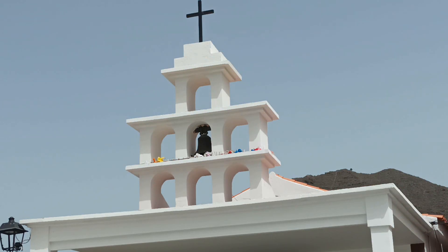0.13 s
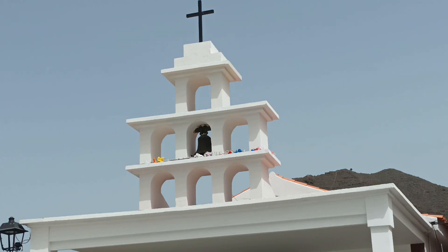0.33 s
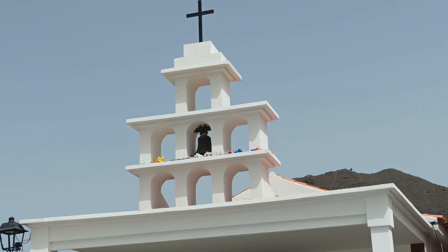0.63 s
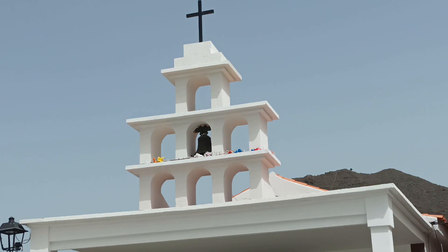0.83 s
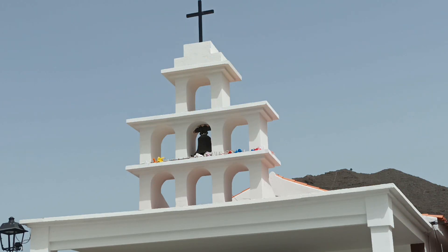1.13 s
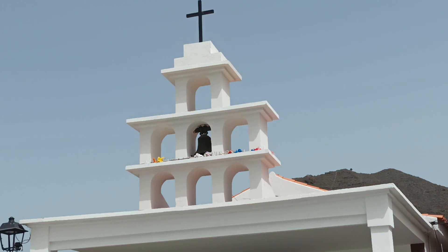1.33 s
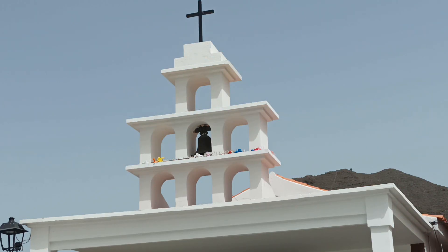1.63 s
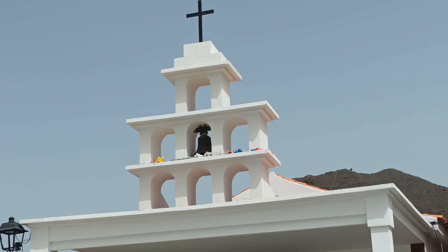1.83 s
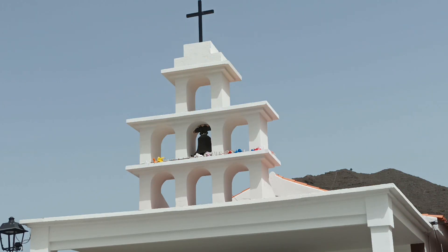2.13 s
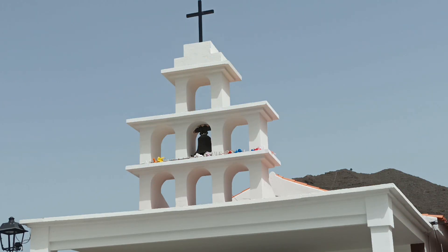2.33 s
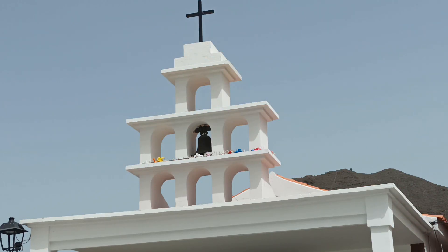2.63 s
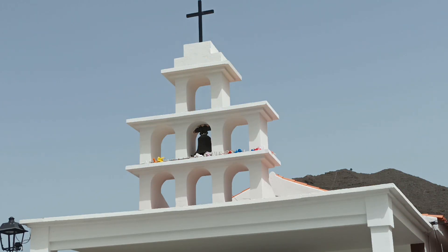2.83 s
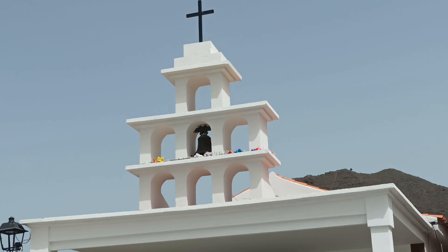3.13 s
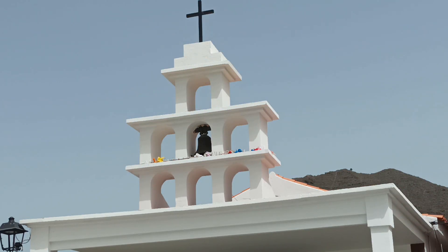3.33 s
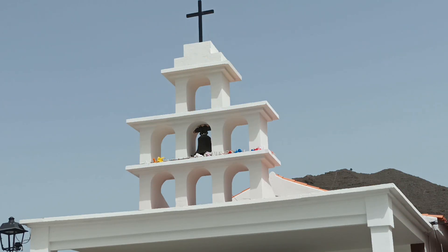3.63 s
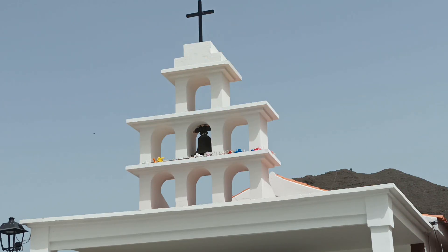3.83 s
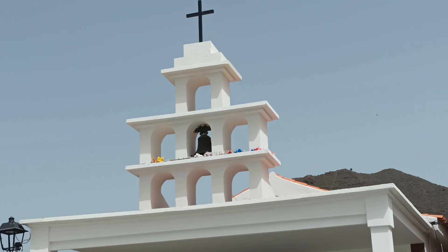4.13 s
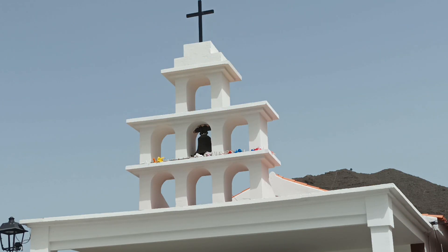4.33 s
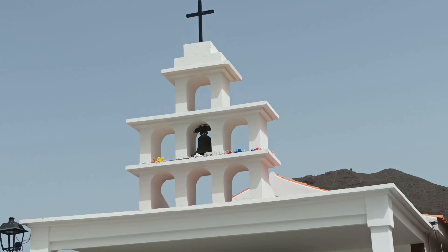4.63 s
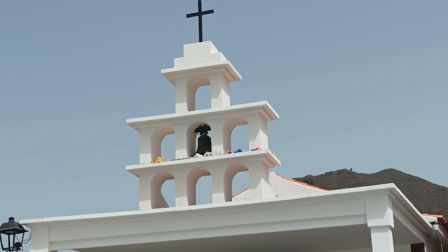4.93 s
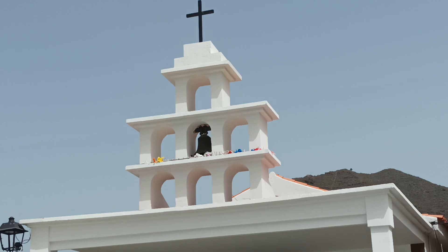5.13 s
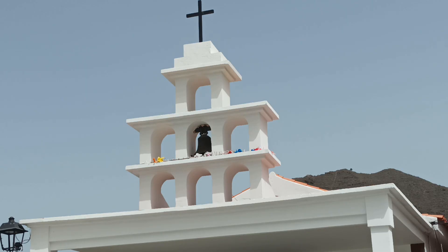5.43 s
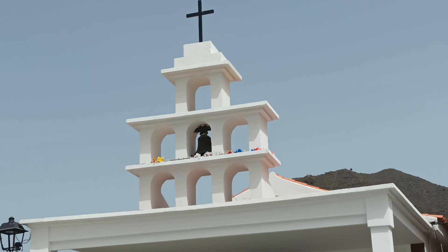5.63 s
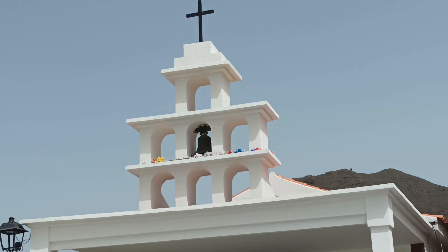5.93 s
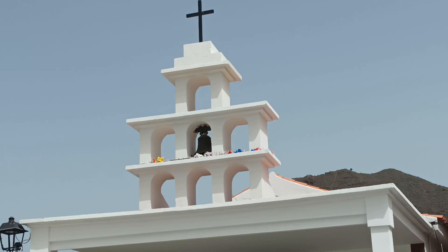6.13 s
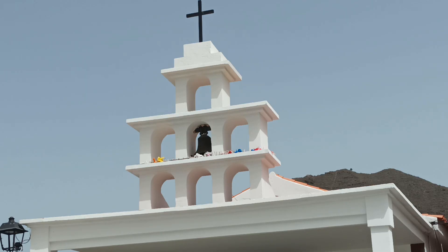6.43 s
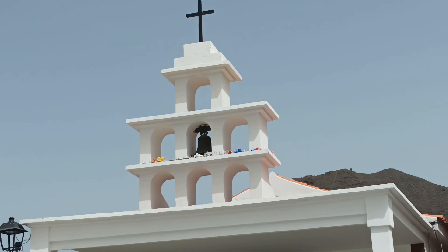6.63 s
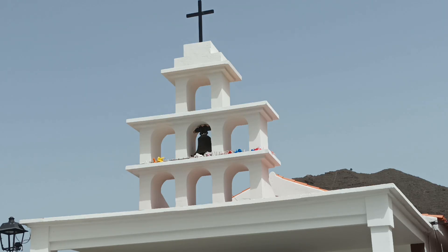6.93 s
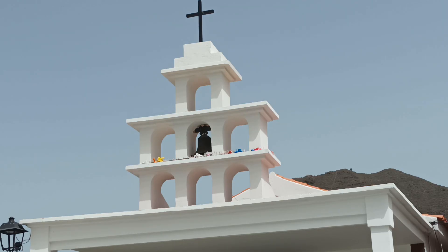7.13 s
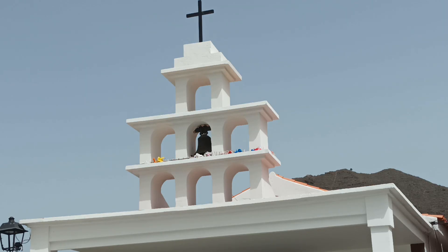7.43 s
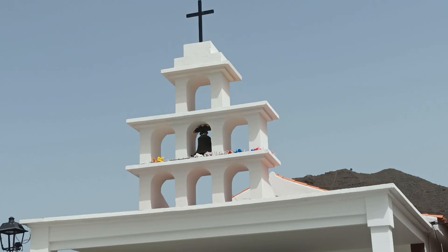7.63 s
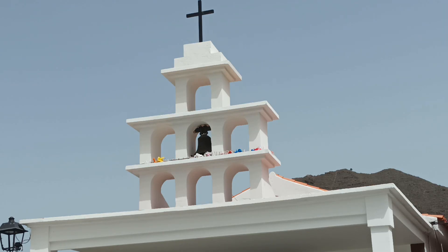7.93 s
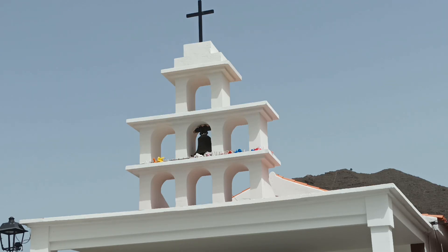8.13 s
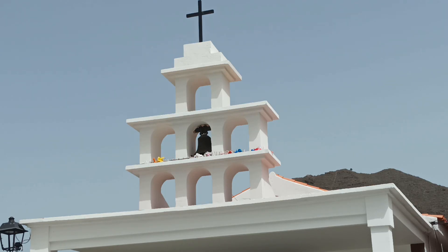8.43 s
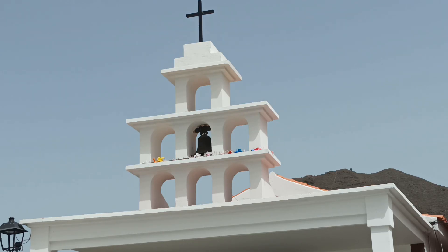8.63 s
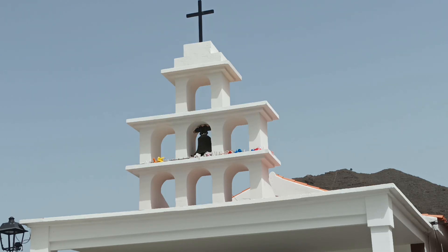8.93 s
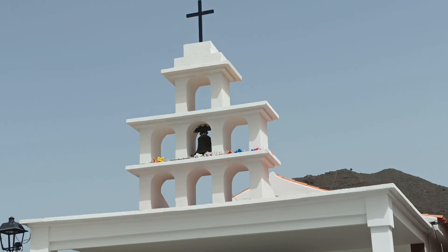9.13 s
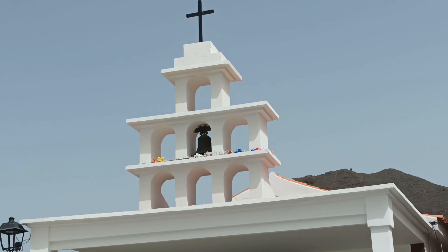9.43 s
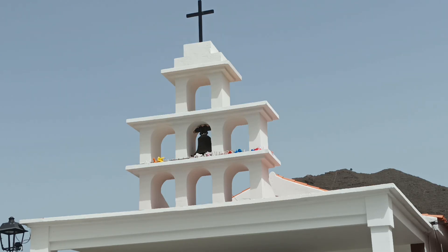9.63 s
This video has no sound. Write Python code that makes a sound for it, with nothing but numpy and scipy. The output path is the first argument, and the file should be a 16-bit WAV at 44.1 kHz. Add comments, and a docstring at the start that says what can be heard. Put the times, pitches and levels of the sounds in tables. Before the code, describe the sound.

A church bell strikes four times, slow and even, each stroke ringing into a lingering hum, with light wind on the microphone.

```python
"""A bronze chapel bell, struck every 2.3 s, rings as a sum of damped modes over a brief noisy clang.
Its motor hammer clunks before and after each blow. A dove coos one phrase of three notes, wind eddies
buffet the left microphone port, small ticks and rustles sound nearby and a village hums far away.
A limiter ducks on each blow, so the long low partials swell as its gain recovers."""
import sys
import numpy as np
from scipy import signal
from scipy.fft import rfft, irfft, next_fast_len
from scipy.io import wavfile
from scipy.ndimage import uniform_filter1d, map_coordinates

SR = 44100
rng = np.random.default_rng(int(sys.argv[2]) if len(sys.argv) > 2 else 0)


def int16_out(signal):
    """Quantize to a 16-bit WAV file."""
    q = np.round(np.clip(np.atleast_2d(signal).T, -1, 1) * 32767)
    wavfile.write(sys.argv[1], SR, q.astype(np.int16))


N = 430857

# The bell's modes. Each row: frequency in Hz, relative level in dB, 60 dB decay time in seconds,
# left-right difference in dB, phase lead of the left in radians, starting sign.
BELL_MODES = [(436.8, -41.5, 13.71, 0.2, 0.0, 1.0), (447.2, -22.8, 13.71, -0.5, -0.3, 1.0),
              (762.8, -39.1, 9.82, -3.0, -1.1, 1.0), (764.4, -23.6, 9.82, -1.8, -2.9, 1.0),
              (1020.9, -22.8, 7.52, 1.9, 2.85, 1.0), (1221.9, -22.0, 2.26, 0.2, 0.2, -1.0),
              (1223.85, -22.8, 2.26, 1.2, -0.0, 1.0), (1724.2, -4.3, 1.85, 2.4, -0.2, 1.0),
              (1917.6, -8.2, 1.16, -0.3, -0.1, 1.0), (1939.6, -15.5, 1.15, 3.9, -0.9, 1.0),
              (1941.3, -17.5, 1.15, 0.8, -0.4, 1.0), (2097.8, -13.6, 0.83, -1.8, -0.1, 1.0),
              (2294.5, -14.7, 0.68, 0.3, -0.6, 1.0), (2491.1, -27.8, 1.09, 1.0, -1.3, 1.0),
              (2586.5, -31.7, 1.73, 0.0, 1.3, 1.0), (2594.0, -12.1, 1.73, -0.5, -1.5, 1.0),
              (2700.4, -14.8, 1.33, 5.1, -0.5, 1.0), (2706.4, -29.1, 1.33, 3.1, -2.9, 1.0),
              (2887.0, -24, 0.64, 6.7, -1.7, 1.0), (3168.8, -19.9, 1.09, 0.2, 2.0, 1.0),
              (3291.7, -30.0, 1.09, 2.5, -0.6, -1.0), (3302.0, -19.7, 1.09, -0.6, -0.8, 1.0),
              (3394.0, -25.8, 0.83, 0.7, -0.7, 1.0), (3398.3, -23.9, 0.83, -1.6, -0.6, 1.0),
              (3474.2, -21.2, 1.09, 2.8, 0.4, 1.0), (3561.0, -5.7, 1.37, -0.5, 0.7, 1.0),
              (3923.8, -37.0, 1.52, -0.2, 1.7, 1.0), (3931.8, -36.4, 1.52, -7.3, 1.4, 1.0),
              (4103.7, -29.5, 1.05, -1.8, -0.4, 1.0), (4126.4, -25.3, 1.24, -3.1, 0.1, 1.0),
              (4203.0, -33.5, 1.16, -1.5, 0.2, 1.0), (4215.0, -37.2, 1.16, -1.5, 0.5, 1.0),
              (4364.0, -37.1, 0.95, 3.8, -0.7, 1.0), (4443.0, -36.4, 0.95, -2.1, -1.3, 1.0),
              (4602.0, -18.7, 1.21, -2.2, -0.5, -1.0), (4605.0, -26.6, 1.21, -8.4, -0.7, 1.0),
              (4760.0, -30.1, 0.73, 6.4, -0.3, 1.0), (4800.0, -36.5, 0.73, -2.2, -0.6, 1.0),
              (4940.3, -31.7, 0.89, -5.5, 0.7, 1.0), (5224.0, -32.4, 0.89, -6.4, 0.8, 1.0),
              (5350.0, -33.6, 0.89, -3.8, 2.3, 1.0), (5371.0, -39.0, 0.83, 0.2, 0.5, 1.0),
              (5703.1, -25.3, 1.19, -4.3, 1.7, 1.0), (6121.0, -30.1, 0.78, -3.1, 1.3, 1.0),
              (6162.0, -39.1, 0.78, 3.0, 1.7, 1.0), (6259.0, -37.3, 0.78, 0.8, -0.9, 1.0),
              (6444.0, -43.3, 0.64, 6.6, 0.4, 1.0), (6541.0, -41.6, 0.64, -1.4, 1.2, 1.0),
              (6778.0, -41.2, 0.83, 0.7, 1.6, 1.0), (6840.1, -30.5, 1.02, -5.5, 0.4, -1.0),
              (6848.4, -25.0, 1.02, -4.9, -0.5, 1.0), (7612.0, -40.4, 0.49, -5.2, -0.8, 1.0),
              (8005.0, -35.2, 1.0, 2.6, -0.5, 1.0), (8180.0, -41.0, 0.82, 2.1, 1.3, 1.0),
              (8613.0, -47.1, 0.72, 2.0, -2.2, 1.0), (8690.0, -43.2, 0.63, 5.8, 0.1, 1.0),
              (9181.0, -36.5, 0.82, 8.1, -1.2, 1.0), (9822.0, -39.4, 0.82, 12.0, 1.1, 1.0),
              (10020.0, -41.8, 0.67, 12.0, 0.9, 1.0), (10111.0, -46.5, 0.76, 11.1, 1.5, 1.0),
              (10351.0, -33.7, 0.76, 10.9, 2.3, 1.0), (10810.0, -41.6, 0.48, 11.5, 1.7, 1.0),
              (11248.0, -48.5, 0.55, 12.0, -2.8, 1.0), (11520.0, -41, 0.63, 12.0, -2.6, 1.0),
              (11801.0, -51.6, 0.67, 12.0, -3.0, 1.0), (12399.0, -52, 0.48, 12.0, -1.8, 1.0),
              (12668.0, -50, 0.52, 12.0, 1.6, 1.0), (13826.0, -57, 0.52, 7.1, -2.3, 1.0)]
# Hammer blows; the four long partials vary, as when old ringing helps or fights a blow. Each row: start
# in seconds, then in dB the blow's gain, gains of lower hum, hum, prime and tierce, left-right
# difference, relative level of the release clunk.
BLOWS = [(-1.554, 0, 5, 0, -1, -2, 0, -34), (.746, 0, 1, 2, 2, 0, .3, -33),
         (3.046, 0, 4, -4, 1, -1, -1, -34), (5.346, 0, -1, .1, .1, 2, .5, -60),
         (7.647, 0, .1, 1, -1, -1, .1, -34)]
LONG_PARTIAL_EDGES_HZ = [440, 450, 800, 1100]  # upper bounds of lower hum, hum, prime and tierce


def bell():
    """Modal superposition: each blow restarts the decaying sines, and close pairs of modes beat."""
    starts = [round(blow[0] * SR) for blow in BLOWS]
    stops = starts[1:] + [N]
    early = -starts[0]  # the first blow falls before time zero
    out = np.zeros((2, early + N))
    for hz, db, t60, pan_db, lead, sign in BELL_MODES:
        t = np.arange(round(min(2.31, 1.35 * t60) * SR)) / SR
        envelope = amp(db - 60 * t / t60) * (1 - np.exp(-t / .006))
        ring = sign * envelope * np.sin(2 * np.pi * hz * t + lead * np.array([[.5], [-.5]]))
        group = np.searchsorted(LONG_PARTIAL_EDGES_HZ, hz)
        for start, stop, (_, blow_db, *long_db, blow_pan_db, _) in zip(starts, stops, BLOWS):
            choked = ring[:, :stop - start]
            gain = amp(blow_db + (long_db + [0])[group]) * sides(pan_db + blow_pan_db)
            at = early + start
            out[:, at:at + choked.shape[1]] += gain * choked
    return out[:, early:]


def moving_air(x, depth_db=2.8, phase_depth=.7):
    """Multipath fading: moving air and echoes make each partial waver at each port, high ones most."""
    hz, _, spectra = signal.stft(x, SR, nperseg=1024)
    field = rng.standard_normal((2,) + spectra.shape, dtype=np.float32)
    for size, axis in ((4, 2), (4, 2), (9, 3), (9, 3)):  # smooth over frequency, then time
        field = uniform_filter1d(field, size, axis)
    swell, shift = unit(field)
    stir = np.clip(hz / 6000, .13, 1.2)[:, None]
    fading = amp(depth_db * stir * swell) * np.exp(1j * phase_depth * stir * shift)
    return signal.istft(spectra * fading, SR, nperseg=1024)[1][:, :N]


# The clang's spectrum. Each row: frequency in Hz, relative density in dB.
CLANG_SPECTRUM = [(100, 1), (200, 9), (300, 7), (1000, 3), (1600, 0), (3500, -1), (6000, -14), (10000, -21),
                  (15500, -41)]
# Its damping. Each row: frequency in Hz, 60 dB decay time of the direct sound in seconds.
CLANG_DECAY = [(200, .22), (1000, .22), (2000, .28), (5000, .3), (12000, .2)]


def clang():
    """Modal overlap: countless short modes merge into noise; the walls reverberate four times as long."""
    noise = stereo_noise(CLANG_SPECTRUM, [(300, .7), (3000, .3)])
    hz, t, spectra = signal.stft(noise, SR, nperseg=128)
    t60 = along(CLANG_DECAY, hz)[:, None]
    latest = np.searchsorted([blow[0] for blow in BLOWS], t) - 1
    start, db = np.transpose(BLOWS)[:2, latest]
    decay_db = 60 * (t - start) / t60
    direct, walls = amp(db - 20 - decay_db), amp(db - 36 - decay_db / 4)
    return signal.istft(spectra * (direct + walls), SR, nperseg=128)[1][:, :N]


# Spectra of a clunk's body, its treble and the release. Each row: frequency in Hz, relative density in dB.
CLUNK_SPECTRUM = [(70, -30), (150, -4), (300, 0), (600, -3), (1000, -8), (1600, -15), (3000, -35),
                  (6000, -80)]
TREBLE_SPECTRUM = [(800, -4), (2000, 0), (3500, -2), (5500, -10), (8000, -26), (15500, -45)]
CLINK_SPECTRUM = [(800, -6), (2200, -5), (3300, 0), (4300, -14), (5400, -4), (6500, -24), (15500, -48)]
# The hammer's bounces. Each row: delay after a blow in seconds, relative level in dB, treble gain in dB.
BOUNCES = [(.288, -33, -12), (.442, -34, -12), (.565, -40, -14)]
# Lone dull knocks. Each row: start in seconds, relative level in dB, treble gain in dB.
KNOCKS = [(3.937, -39, -19), (9.125, -39, -19)]


def hammer(release_lead_s=.022, clink_db=-1):
    """Damped impacts: the hammer is let go with a clunk and a bright clink, then falls back and bounces."""
    release_s, release_db = np.transpose([(blow[0] - release_lead_s, blow[-1]) for blow in BLOWS[1:]])
    bounces = [(blow[0] + delay, db, treble_db) for blow in BLOWS[1:] for delay, db, treble_db in BOUNCES]
    starts, db, treble_db = np.transpose(bounces + KNOCKS)
    body = bursts([*starts, *release_s], [*db, *release_db], rise=.008, t60=.34)
    body = body * stereo_noise(CLUNK_SPECTRUM, [(300, .85)])
    treble = bursts(starts, db + treble_db, rise=.004, t60=.2) * stereo_noise(TREBLE_SPECTRUM, [(300, .5)])
    clink = bursts(release_s, release_db + clink_db, rise=.003, t60=.07)
    clink = clink * stereo_noise(CLINK_SPECTRUM, [(300, .5)])
    return sides(2) * (body + treble + clink)


# The dove's notes. Each row: start in seconds, length in seconds, top pitch in Hz, relative level in dB.
COOS = [(4.41, .21, 503, -40), (4.68, .35, 503, -39), (5.04, .14, 486, -48)]


def dove(sag_hz=24, edge_s=.05):
    """Frequency modulation: each nearly pure note is an arch of pitch; a phase lead sets it to one side."""
    t, out = np.arange(N) / SR, np.zeros((2, N))
    for start, length, top_hz, db in COOS:
        progress = np.clip((t - start) / length, 0, 1)
        hz = top_hz - sag_hz * (2 * progress - 1) ** 2
        phase = 2 * np.pi * np.cumsum(hz) / SR + .6 * np.array([[1], [-1]])
        envelope = np.clip(np.minimum(progress, 1 - progress) * length / edge_s, 0, 1)
        out += amp(db) * envelope * np.sin(phase)
    return out * amp(3 + 1.5 * wobble(30))


# The steady wind. Each row: time in seconds, relative level in dB.
WIND_LEVEL = [(0, -56), (1.06, -47), (1.36, -52), (2.42, -61), (3.4, -59), (4.51, -55), (4.84, -58),
              (6.07, -48), (6.6, -51), (7.21, -52), (7.43, -49), (8.16, -47), (9.0, -49), (9.39, -57),
              (9.77, -55)]
# The strongest eddies. Each row: time in seconds, relative level in dB.
EDDIES = [(0.472, -23), (0.994, -29), (5.577, -30), (5.859, -27), (6.129, -31), (6.205, -26), (6.254, -25),
          (6.326, -23), (6.372, -21), (6.773, -30), (6.915, -30), (6.981, -31), (7.258, -26), (7.357, -24),
          (7.539, -22), (7.786, -25), (7.911, -21), (7.967, -22), (8.089, -30), (8.22, -24), (8.298, -29),
          (8.5, -27), (8.649, -29), (8.779, -31), (8.949, -26), (9.672, -23)]
# The flutter's spectrum. Each row: frequency in Hz, relative density in dB.
FLUTTER_SPECTRUM = [(15, -55), (30, -27), (60, -3), (85, 0), (150, -7), (250, -18), (400, -32), (900, -90)]
# The exposed left port and the sheltered right one. Each row: flutter gain in dB.
PORT_EXPOSURE = [
    [9],
    [-5],
]


def wind(median_thump_hz=95, thump_sigma_s=.0065, stir_sigma_s=.035, stir_db=-23, low_cut_hz=38):
    """Turbulent pressure: eddies flutter on the left port; the strongest thump and stir up more flutter."""
    thumps, stirred = np.zeros((2, N + SR)), np.zeros(N + SR)
    t = np.arange(-SR // 8, SR // 8) / SR
    for (centre, db), (detune, *phases) in zip(EDDIES, rng.standard_normal((len(EDDIES), 3))):
        hz = median_thump_hz * np.exp(.2 * detune)
        swing = np.cos(2 * np.pi * hz * t + 2 * np.c_[phases])
        first = round(centre * SR) - SR // 8
        span = slice(first, first + len(t))
        thumps[:, span] += amp(db + 3) * np.exp(-.5 * (t / thump_sigma_s) ** 2) * swing
        stirred[span] += amp(db + stir_db) * np.exp(-.5 * (t / stir_sigma_s) ** 2)
    flutter = unit(amp(3 * wobble(9) + 5 * wobble(30)) * stereo_noise(FLUTTER_SPECTRUM, [(30, .1)]))
    pressure = amp(PORT_EXPOSURE) * (amp(curve(WIND_LEVEL)) + stirred[:N]) * flutter
    pressure += amp([[0], [-15]]) * thumps[:, :N]  # weaker on the sheltered right
    return filtered(pressure, lambda hz: 1 / (1 + (low_cut_hz / (hz + 1)) ** 4))


# Dry ticks. Each row: start in seconds, relative level in dB, left-right difference in dB.
TICKS = [(0.1341, -42, -2.5), (9.3342, -42, -3.0)]
# Soft rustles. Each row: centre in seconds, relative level in dB, width in seconds.
RUSTLES = [(.55, -75, .15), (1.23, -67, .05), (2.09, -71, .05), (2.74, -68, .05), (3.75, -69, .05),
           (3.97, -68, .06), (5.1, -70, .1), (9.14, -67, .03), (9.72, -74, .1)]
# Their spectrum. Each row: frequency in Hz, relative density in dB.
RUSTLE_SPECTRUM = [(1000, -10), (3000, 0), (8000, -3), (12000, -8), (15500, -20)]


def ticks_and_rustles():
    """Amplitude-shaped noise: sharp decays are heard as ticks, smooth swells as rustles on the left."""
    t = np.arange(N) / SR
    ticks = sum(sides(pan_db) * bursts(start, db - 1, rise=.0003, t60=.012) for start, db, pan_db in TICKS)
    rustles = sum(amp(db) * np.exp(-2 * ((t - centre) / width) ** 2) for centre, db, width in RUSTLES)
    snap = stereo_noise([(1500, -20), (4500, 0), (9000, -6), (15500, -25)], [(300, .9)])
    return ticks * snap + sides(10) * rustles * stereo_noise(RUSTLE_SPECTRUM, [(300, .3)])


# Spectra of far traffic and of the hiss. Each row: frequency in Hz, relative density in dB.
MURMUR_SPECTRUM = [(25, -36), (50, -16), (100, -7), (160, -3), (250, -4), (400, -7), (600, -10), (900, -15),
                   (1400, -25), (2500, -45), (6000, -90)]
HISS_SPECTRUM = [(300, -30), (700, -10), (1300, -4), (2000, 0), (3000, -3.5), (4500, -12), (6300, -19),
                 (10000, -28.5), (15500, -40)]
# The drift of the hiss. Each row: time in seconds, relative level in dB.
HISS_LEVEL = [(0, -57.5), (2.2, -55), (2.9, -55.5), (4.2, -57.5), (4.9, -56), (6.5, -59), (7.5, -57),
              (9, -57.5), (9.77, -56.5)]
# The likeness of the two ports. Each row: frequency in Hz, left-right correlation.
VILLAGE_COHERENCE = [(100, .8), (400, .7), (1500, .4), (6000, .1)]


def village(murmur_db=-48):
    """A diffuse field: far traffic murmur and smooth hiss, less alike at the ports as frequency rises."""
    murmur = amp(murmur_db + 1.2 * wobble(6)) * stereo_noise(MURMUR_SPECTRUM, VILLAGE_COHERENCE)
    hiss_gain = amp(curve(HISS_LEVEL) + .7 * wobble(3)) * sides(2.5)
    return murmur + hiss_gain * stereo_noise(HISS_SPECTRUM, VILLAGE_COHERENCE)


def amp(db):
    """Amplitude ratio of a level in dB."""
    return 10 ** (np.asarray(db) / 20)


def unit(x):
    """Normalisation to rms 1."""
    return x / np.sqrt(np.mean(x ** 2) + 1e-20)


def along(points, hz):
    """Interpolation of (Hz, value) points on a log frequency axis."""
    knots_hz, values = np.transpose(points)
    return np.interp(np.log(hz + 1), np.log(knots_hz + 1), values)


def curve(points):
    """Linear interpolation of (seconds, value) points at every sample."""
    return np.interp(np.arange(N) / SR, *np.transpose(points))


def wobble(rate):
    """Slow random modulation: a spline through rate knots a second."""
    return map_coordinates(rng.standard_normal(int(N * rate / SR) + 4), [np.arange(N) * rate / SR])


def sides(pan_db):
    """Amplitude panning: left and right gains for a level difference."""
    return amp([[pan_db / 2], [-pan_db / 2]])


def filtered(x, response):
    """Linear filtering: the spectrum of x times a frequency response."""
    size = next_fast_len(N + SR // 2)
    return irfft(rfft(x, size) * response(np.fft.rfftfreq(size, 1 / SR)), size)[..., :N]


def stereo_noise(spectrum, coherence):
    """Partly coherent noise of rms 1: the balance of mid and side sets the left-right correlation."""
    def response(hz):
        angle = np.arccos(np.clip(along(coherence, hz), -1, 1)) / 2
        return amp(along(spectrum, hz)) * [np.cos(angle), np.sin(angle)]
    mid, side = filtered(rng.standard_normal((2, N)), response)
    return unit(np.array([mid + side, mid - side]))


def bursts(times, levels_db, rise, t60):
    """An envelope by convolution: each impulse rises quickly and decays exponentially."""
    impulses, t = np.zeros(N), np.arange(round(2 * t60 * SR)) / SR
    impulses[np.round(np.multiply(times, SR)).astype(int)] = amp(levels_db)
    return signal.oaconvolve(impulses, amp(-60 * t / t60) * (1 - np.exp(-t / rise)))[:N]


def scene():
    """Superposition: the pressures of all sources add at the two microphone ports."""
    return moving_air(bell()) + clang() + hammer() + ticks_and_rustles() + dove() + wind() + village()


def record(dry, knee_db=-15, softness_db=3.0, squeeze=.86, window_s=.02, top_hz=15500):
    """Dynamic range compression: a limiter turns down what passes a soft knee; a band limit follows."""
    power = np.abs(uniform_filter1d(np.mean(dry ** 2, axis=0), round(window_s * SR)))
    excess_db = 10 * np.log10(power + 1e-12) - knee_db
    cut_db = squeeze * softness_db * np.logaddexp(0, excess_db / softness_db)
    return filtered(dry * amp(-cut_db), lambda hz: hz < top_hz)


dry = scene()
out = record(dry)
int16_out(out)
```